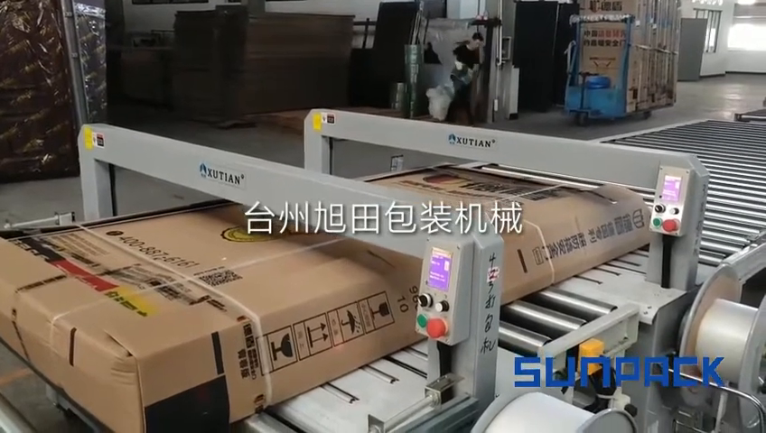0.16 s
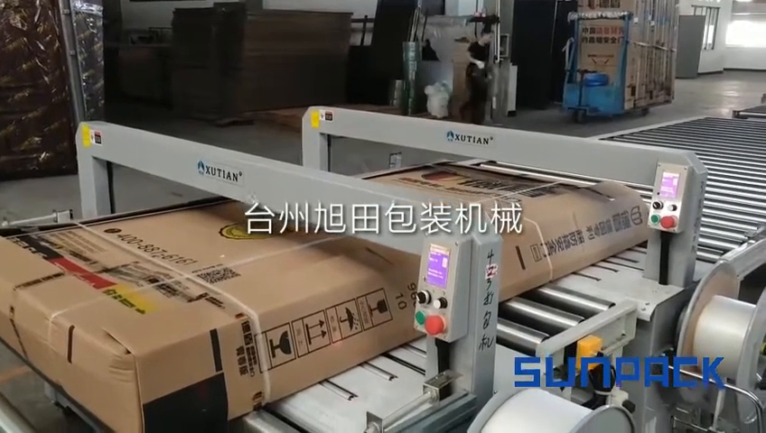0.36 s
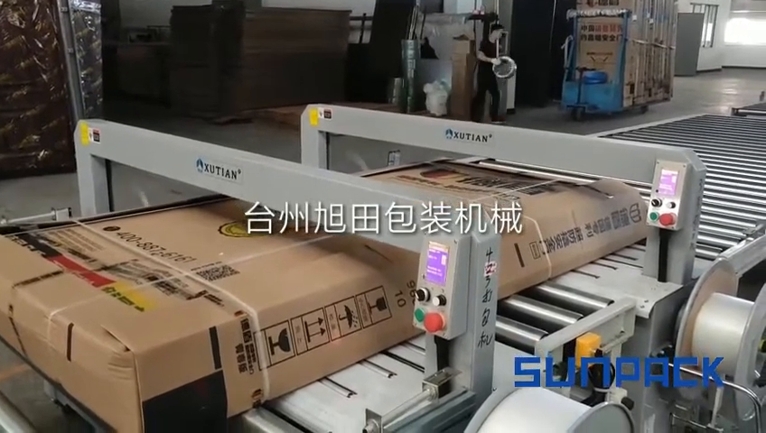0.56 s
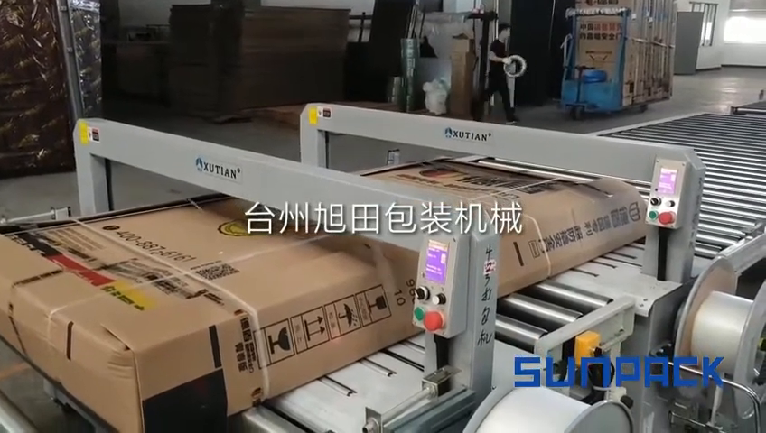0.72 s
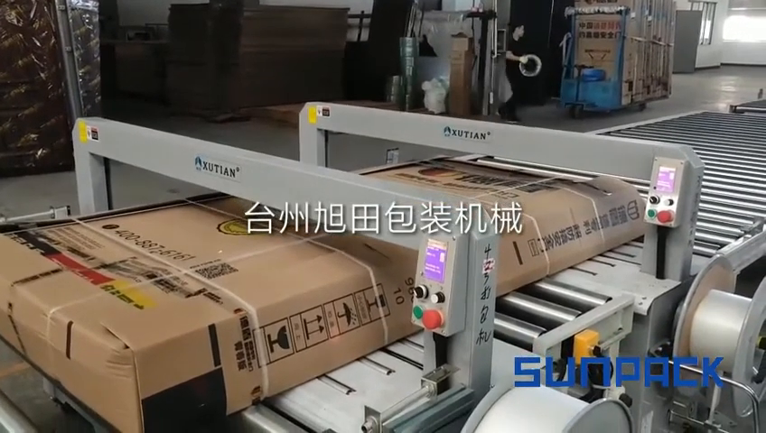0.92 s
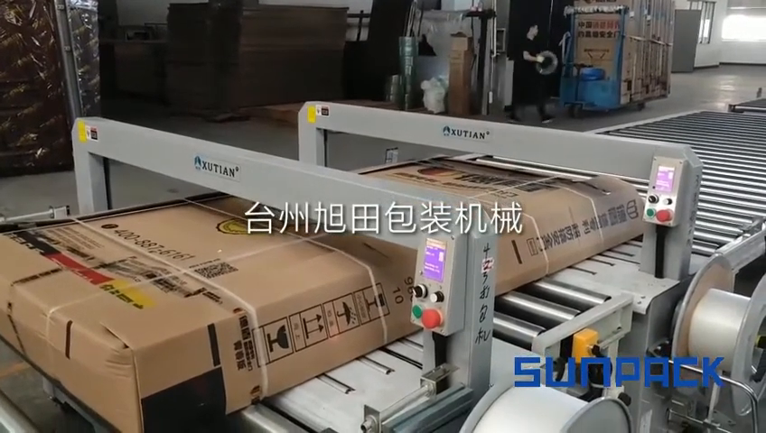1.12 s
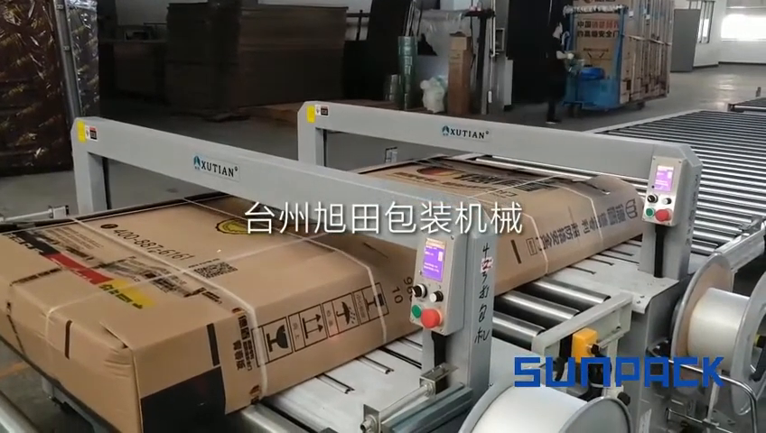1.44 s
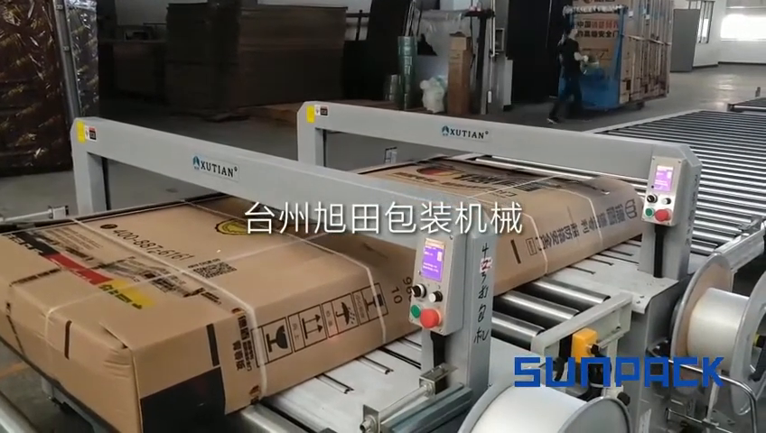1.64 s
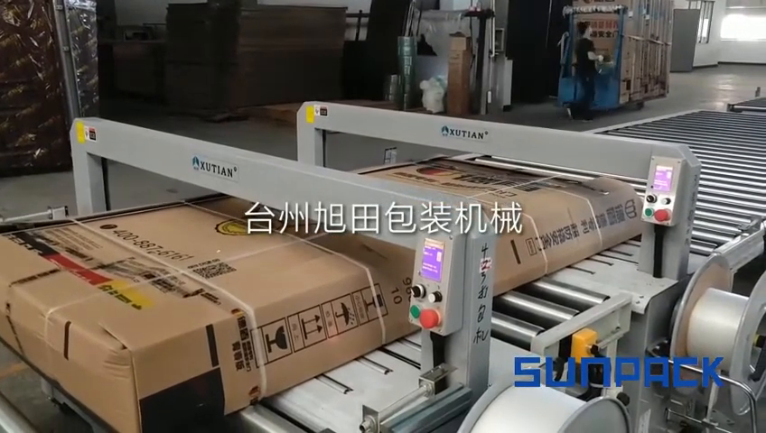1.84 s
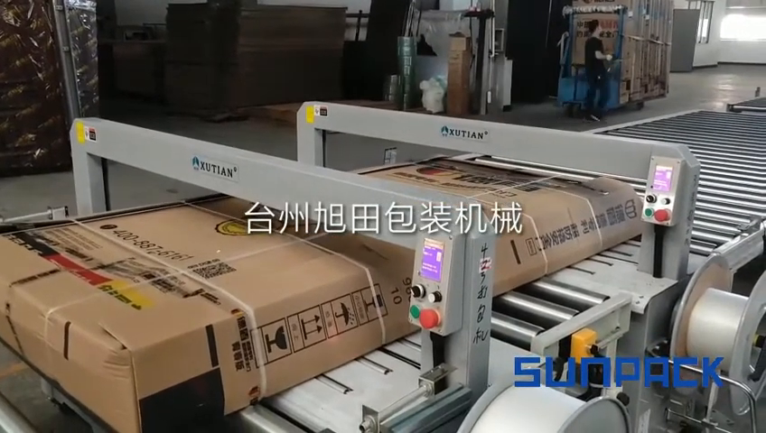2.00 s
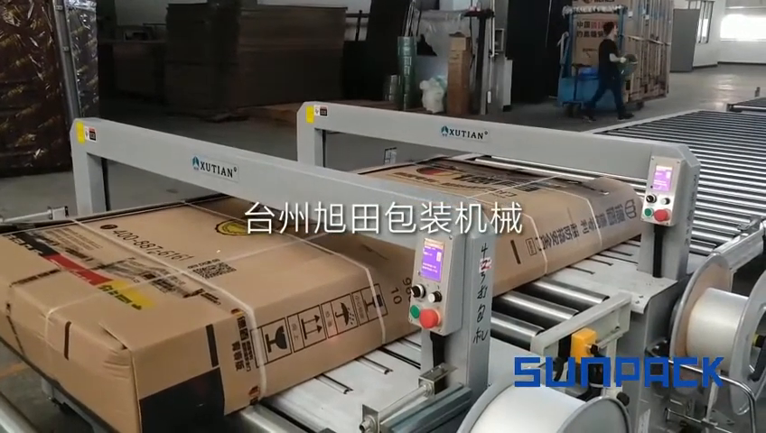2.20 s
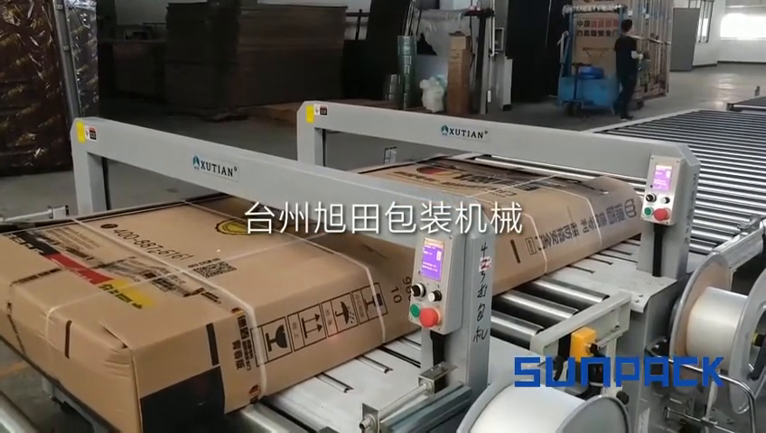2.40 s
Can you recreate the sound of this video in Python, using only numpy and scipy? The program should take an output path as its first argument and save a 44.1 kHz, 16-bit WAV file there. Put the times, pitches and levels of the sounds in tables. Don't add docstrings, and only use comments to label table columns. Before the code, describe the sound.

A strapping machine cycles in an echoing factory hall with low motor and roller rumble. Faint air hiss fades by 0.5 s; a slap at 0.35. Strap rasps back harshly at 0.43-0.75 with sharp clacks. A humming, knocking judder runs 1.06-1.45, then loud metallic clatter until 1.85. New strap feeds with a swelling rasp, 1.88-2.3, followed by clacks at 2.4 and 2.55.

```python
import sys
import numpy as np
from scipy import signal
from scipy.fft import rfft, irfft, next_fast_len
from scipy.io import wavfile
from scipy.ndimage import uniform_filter1d

SR = 44100
rng = np.random.default_rng(int(sys.argv[2]) if len(sys.argv) > 2 else 0)


def volts_from_db(level):
    exponent = np.asarray(level, float) / 20
    return 10 ** exponent


def unload_wav(signal):
    wavfile.write(
        sys.argv[1],
        SR,
        np.round(np.clip(np.atleast_2d(signal).T, -1, 1) * 32767).astype(np.int16),
    )


N = 112896
T = np.arange(N) / SR
SIZE = next_fast_len(N + SR // 4)


def unit(x):
    return x / np.sqrt(np.mean(x ** 2))


def noise():
    return rng.standard_normal((2, N))


def shape(x, gain):
    hz = np.arange(SIZE // 2 + 1) * SR / SIZE + 1
    return irfft(rfft(x, SIZE) * gain(hz), SIZE)[..., :N]


def butter(x, order, hz, kind="low"):
    return signal.sosfilt(signal.butter(order, hz, kind, fs=SR, output="sos"), x)


def colour(x, table, peaks=()):
    hz, db = np.array(table).T

    def gain(f):
        raised = 1 + sum(volts_from_db(g) / (1 + (2 * (f - c) / w) ** 2) for c, w, g in peaks)
        return volts_from_db(np.interp(np.log(f), np.log(hz), db)) * raised
    return shape(x, gain)


def ring(x, modes):
    def gain(f):
        g = 0
        for c, db, t60 in modes:
            damping = 1j * f * np.log(1000) / (np.pi * t60)
            g = g + volts_from_db(db) * c / np.sqrt(t60) / (c ** 2 - f ** 2 + damping)
        return g / np.sqrt(np.mean(np.abs(g) ** 2))
    return shape(x, gain)


def walk(rate_hz):
    k = int(SR / rate_hz)
    held = np.repeat(rng.standard_normal(N // k + 1), k)
    return 0.83 * uniform_filter1d(uniform_filter1d(held, k), k)[:N]


def curve(table):
    s, db = np.array(table).T
    edges = np.clip(np.minimum(T - s[0], s[-1] - T) / 0.0075, 0, 1)
    return volts_from_db(np.interp(T, s, db)) * edges


def blows(rows, decays, hold, db, strike_db):
    thud_db, crack_db, crack_late_s = 6, 13, .0006
    puff_db, puff_s = -17, .00045
    drive = np.zeros((4, 2, N))
    contact = noise() * volts_from_db(0.1 * walk(500))
    for (s, peak, low, high), decay in zip(rows, decays):
        now = slice(int(s * SR) - 200, int((s + 9 * decay) * SR) + 200)
        age = T[now] - s - np.array([[0], [0], [crack_late_s]])
        size = volts_from_db(peak + db + np.array([[low + thud_db], [0], [high + crack_db]]))
        push = size * np.exp(-np.maximum(age / decay - hold, 0)) * np.clip(age / 0.00019, 0, 1)
        drive[:3, :, now] += push[:, None] * contact[:, now]
        strike = size * volts_from_db(strike_db) * np.exp(-(age / .00005) ** 2)
        drive[:2, :, now] -= strike[:2, None]
        drive[3, 0, now] -= size[0] * volts_from_db(strike_db + puff_db) * np.exp(-(age[0] / puff_s) ** 2)
    return drive


# start_s, ring_db, thud_over_ring_db, crack_over_ring_db
CLACKS = [(.6232, -17.5, -22, 3.5), (.6420, -12, -25, -6), (1.4615, -30, -7, -19), (1.4715, -19, -14, -13),
          (1.4790, -37, -13, -26), (1.4882, -15, -14, -7.5), (1.5030, -9, -12, -6.5),
          (1.5380, -7, -7, -6.5), (1.5435, -17, -34, -8), (1.5488, -14, -8, -27), (1.5644, -8.5, -15, -13),
          (1.5797, -7, -16, -8), (1.5988, -11.5, -7, -2.5), (1.6362, -12, -7, -10), (1.6424, -5, -14.5, -9),
          (1.6693, -20, -2, -3), (1.6765, -12, -10.5, -18), (1.716, -18, -4.5, 1),
          (1.8250, -20.5, -10, -17), (2.4098, -27, -17, 3)]
# start_s, ring_db, thud_over_ring_db, crack_over_ring_db, decay_s
SLAPS = [(0.3458, -20, -9.5, -2.5, 0.035), (0.549, -24, -7, -0.5, 0.046), (1.462, -18, -3.5, -16, 0.054),
         (1.944, -20.5, -12.5, -7.5, 0.086), (0.635, -20, -3, -6.5, 0.023), (0.653, -18.5, -7, -8, 0.019),
         (0.743, -21, -26, -38, 0.074), (1.664, -16.5, 1, -3.5, 0.022), (1.676, -16, -11, -1.5, 0.018),
         (1.779, -19.5, -8.5, -6.5, 0.04), (1.823, -11, -5, -9, 0.015), (1.851, -14, -28, -8, 0.019),
         (2.4296, -13, -15.5, -4, 0.028), (2.546, -23.5, -7, -3.5, .02)]
# pitch_hz, level_db, t60_s
FRAME_MODES = [(175, -18, 0.074), (230, -21, 0.076), (290, 5, 0.062), (391.4, 4, 0.025), (488, 0.5, 0.048),
               (643, -3, 0.036), (773, 4.5, 0.029), (938, 10, 0.0051), (1240, -1, 0.036)]
GUIDE_MODES = [(1455, 2.5, 0.0094), (1950, 10, 0.0085), (2127, 4, 0.0081), (2330, 8.5, 0.013),
               (2533, 6, 0.011), (2850, 5, 0.0027), (3165, 6, 0.0072), (4200, 5.5, 0.0033)]
# pitch_hz, level_db
CRACK_COLOUR = [(1470, -21), (2500, -1), (3640, -5.5), (4100, -4.5), (4860, -2.5), (12100, -17),
                (13700, -26), (14600, -106)]


def steelwork():
    slaps = np.array(SLAPS)
    cams = blows(CLACKS, [.0018] * len(CLACKS), hold=0.68, db=-9, strike_db=17)
    whips = blows(slaps[:, :4], slaps[:, 4], hold=0.81, db=-10, strike_db=-10)
    cam_crack = shape(cams[2], lambda f: 1 / (1 + (f / 8400) ** 4))
    crack = whips[2] + volts_from_db(4) * cam_crack
    thud, knock, _, puff = cams + whips
    return ring(thud, FRAME_MODES) + ring(knock, GUIDE_MODES) + volts_from_db(5.5) * colour(crack, CRACK_COLOUR) + puff


# start_s, pitch_hz, level_db, t60_s
PINGS = [(0.348, 4750, -19, 0.037), (.555, 6700, -13.5, .02), (0.6225, 6690, -7.5, 0.019),
         (0.642, 2400, -8.5, 0.041), (0.642, 314, -18.5, 0.077), (.643, 717, -22, 0.069),
         (1.644, 705, -38, 0.062), (1.465, 215, -19, .07), (1.489, 290, -20, .09), (1.504, 298, -16, 0.1),
         (1.539, 290, -18.5, 0.086), (1.565, 302, -25, 0.097), (1.58, 280, -16, 0.11),
         (1.599, 298, -18, 0.12), (1.644, 290, -18, 0.073), (1.678, 720, -19, .07), (0.587, 1850, -15, .03),
         (0.663, 1780, -19, .05), (.664, 328, -19, 0.066), (1.4897, 2360, -13, 0.017),
         (1.505, 2390, -14, 0.03), (1.509, 724, -18, 0.057), (1.539, 2206, -12.5, .03),
         (1.546, 700, -23, 0.036), (1.582, 2315, -7.5, 0.027), (1.6, 716, -14.5, 0.073),
         (1.643, 2330, -4.5, 0.02), (1.779, 245, -17, 0.066), (1.805, 260, -14.5, .04),
         (1.828, 290, -24, 0.12), (1.829, 488, -15, 0.032), (1.848, 1950, -14.5, .06),
         (1.898, 273, -17.5, 0.035), (.745, 260, -37, 0.13), (2.455, 700, -25, 0.08), (2.51, 185, -24, .1),
         (2.52, 264, -24.5, 0.11), (2.4100, 6700, -13, 0.0055), (2.435, 408, -13, 0.044),
         (2.44, 2643, -17.5, .07), (2.55, 5880, -20, 0.026)]


def pings():
    total = np.zeros((2, N))
    for s, hz, db, t60 in PINGS:
        age = np.maximum(T - s + np.array([[0], [.0002]]), 0)
        total += volts_from_db(db - 60 * age / t60) * np.sin(2 * np.pi * hz * age)
    return total


def strap(level, tint, peaks, grain_db, throb_db):
    ticks = noise() * volts_from_db(grain_db * walk(700) + throb_db * walk(47.95))
    return unit(colour(ticks, tint, peaks)) * curve(level)


# time_s, level_db
PULL = [
    (0.41, -43),
    (0.436, -22),
    (0.55, -21.5),
    (0.605, -18),
    (0.617, -27),
    (0.642, -17),
    (0.72, -38),
    (0.748, -33),
    (0.9, -55),
]
# pitch_hz, level_db
PULL_COLOUR = [(530, -12.5), (900, -17), (1390, -14.5), (1900, -2), (2060, -6), (5000, -13.5), (6690, -8.5),
               (11700, -25.5), (14600, -35)]
# pitch_hz, width_hz, level_db
PULL_PEAKS = [(1850, 300, -13), (2520, 150, -4), (3940, 190, -4), (6840, 350, -11)]


def pull_strap():
    return strap(PULL, PULL_COLOUR, PULL_PEAKS, grain_db=1.8, throb_db=1.0)


# time_s, level_db
FEED = [
    (1.88, -24),
    (1.91, -30.5),
    (2.174, -22.5),
    (2.308, -38.5),
    (2.314, -62),
    (2.328, -38),
    (2.36, -34),
]
# pitch_hz, level_db
FEED_COLOUR = [(530, -61), (900, -9), (1690, -9.5), (2340, 0.5), (2890, 0), (4100, 2), (8950, -13.5),
               (13000, -29.5), (14600, -33)]
# pitch_hz, width_hz, level_db
FEED_PEAKS = [(2150, 300, -2), (2420, 580, 5.5), (4100, 190, -6), (7800, 2100, 1)]


def feed_strap():
    return strap(FEED, FEED_COLOUR, FEED_PEAKS, grain_db=2.0, throb_db=0.52)


# time_s, level_db
JUDDER = [
    (1.06, -43),
    (1.078, -32.5),
    (1.15, -31),
    (1.23, -27.5),
    (1.29, -34.5),
    (1.38, -31.5),
    (1.45, -33),
    (1.7, -25),
    (1.76, -45),
    (1.98, -41),
]
# start_s, level_db
KNOCKS = [(1.077, 3.5), (1.096, 2.5), (1.122, 5), (1.146, 1), (1.168, 5), (1.188, 2), (1.204, -6),
          (1.224, -4), (1.241, 2.5), (1.268, 0), (1.292, -1), (1.322, 1), (1.342, -1.5), (1.362, -2.5),
          (1.384, 2), (1.41, -3), (1.431, -12)]
# pitch_hz, level_db, t60_s
HEAD_MODES = [(174, -30, 0.095), (216, 1, 0.066), (264, 1, 0.049), (306, 2, 0.032), (427, -5, 0.042),
              (700, -2.5, 0.028), (820, -2.5, 0.024), (980, -3, 0.016)]


def judder():
    cams_start_s, rate_hz, scatter_db = 1.46, 41, 3
    hum_hz, hum_db, throb_db, hum_ends_s = 225, 2, 1.2, 1.5
    chance = rng.standard_normal((200, 2))
    gaps = (1 + 0.2146 * chance[:, 0]) / rate_hz
    at = ((cams_start_s + np.cumsum(gaps)) * SR).astype(int)
    knocks = np.zeros(N)
    knocks[at[at < N]] = volts_from_db(scatter_db * chance[at < N, 1])
    for s, db in KNOCKS:
        knocks[int(s * SR)] = volts_from_db(db)
    knocks = uniform_filter1d(knocks, 30) + volts_from_db(-32.5) * noise()
    phase = 2 * np.pi * np.cumsum(hum_hz * (1 + 0.0046 * walk(22.0))) / SR
    hum = np.sin(phase) * volts_from_db(hum_db + throb_db * walk(41.2))
    hum = hum * np.clip((hum_ends_s - T) / 0.039, 0, 1)
    return (unit(ring(knocks, HEAD_MODES)) + hum) * curve(JUDDER)


def room(x):
    starts_s, builds_s, split_hz, bass_hz = .006, .035, 3500, 260

    def tail(t60):
        return noise() * volts_from_db(-60 * T / t60) * np.clip((T - starts_s) / builds_s, 0, 1)
    low = butter(tail(0.74), 1, split_hz)
    high = butter(tail(0.43), 1, split_hz, "high")
    echo = butter(low, 1, bass_hz, "high") + high
    echo = echo / np.sqrt(np.sum(echo[0] ** 2))
    return signal.fftconvolve(x, echo, axes=1)[:, :N]


def fading_hiss():
    peak_hz, level_db, fade_s, starts_s, rise_s = 4600, -43, .4, 0.053, 0.026
    hiss = unit(shape(noise(), lambda f: f / peak_hz * np.exp(-(f / peak_hz) ** 2 / 2)))
    return volts_from_db(level_db) * np.exp(-(T / fade_s) ** 4) * np.clip((T - starts_s) / rise_s, 0, 1) * hiss


# pitch_hz, level_db
HALL_LOW = [(12, -43), (30, -5), (64, -1), (131, -3), (288, -2.5), (364, -5), (430, -8.5), (699, -5.5),
            (1100, -10.5), (1430, -24), (2420, -120)]
HALL_HIGH = [(650, -24), (1100, -0.5), (1700, 0), (2370, 5.5), (3110, -3), (4690, -8), (7500, -13),
             (10000, -27), (14600, -42)]


def hall():
    level_db, flicker_db = -35, .9
    mains = [(54.5, 11, 1.5)]  # pitch_hz, width_hz, level_db
    motors = unit(colour(noise(), HALL_LOW, mains))
    rollers = unit(colour(noise(), HALL_HIGH, [(2430, 120, -20.0), (1890, 72, -35)]))
    low = volts_from_db(level_db + flicker_db * walk(16)) * motors
    high = volts_from_db(level_db + flicker_db * walk(10.25)) * rollers
    return low + high + fading_hiss()


# pitch_hz, left_minus_right_db
LEAN = [(60, .3), (400, .6), (1300, 1.7), (2300, -2.4), (5000, -.8), (9000, .5), (13000, -1.4)]


def two_ports(mid, side):
    side = shape(side, lambda f: volts_from_db(-24) + volts_from_db(-.8) / np.sqrt(1 + (1150 / f) ** 5))
    hz, db = np.array(LEAN).T
    left = colour(mid + side, np.c_[hz, db / 2])
    right = colour(mid - side, np.c_[hz, -db / 2])
    return np.array([left, right])


def scene():
    machine = steelwork() + pings() + pull_strap() + feed_strap() + judder()
    machine = butter(machine, 3, 155, "high")
    mid, side = machine + volts_from_db(-9.5) * room(machine) + hall()
    return two_ports(mid, side)


def duck(x):
    knee_db, release_s, share = -16, .012, .14
    keep = np.exp(-1 / (release_s * SR))
    power = np.mean(x ** 2, axis=0)
    for _ in range(2):
        power = signal.lfilter([1 - keep], [1, -keep], power)
    return x * (1 + power / volts_from_db(2 * knee_db)) ** -share


def roll_off(x):
    return signal.sosfilt(signal.butter(12, 14760, fs=SR, output="sos"), x)


def record(dry):
    ceiling, top_hz = .86, 14700
    rounded = ceiling * np.tanh(duck(dry) / ceiling)
    mix = signal.sosfilt(signal.ellip(8, .2, 60, top_hz, fs=SR, output="sos"), rounded)
    return roll_off(mix)


dry = scene()
out = record(dry)
unload_wav(out)
```